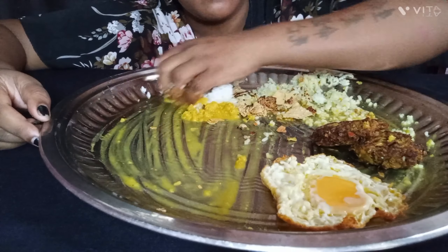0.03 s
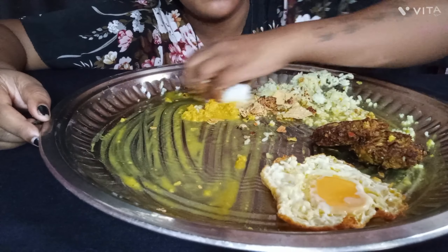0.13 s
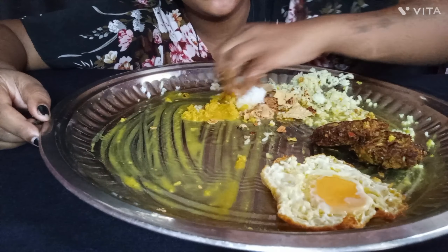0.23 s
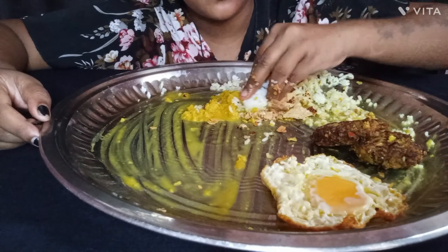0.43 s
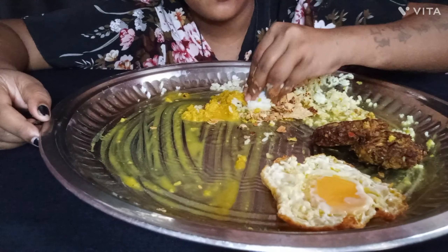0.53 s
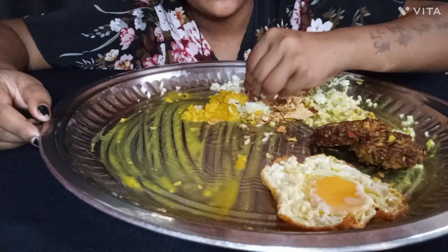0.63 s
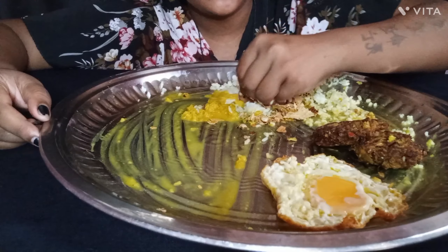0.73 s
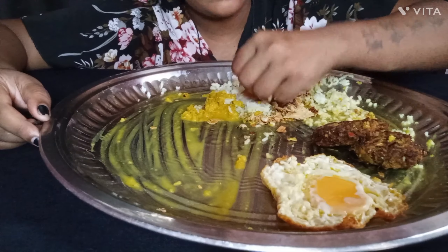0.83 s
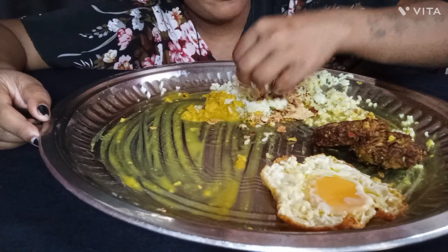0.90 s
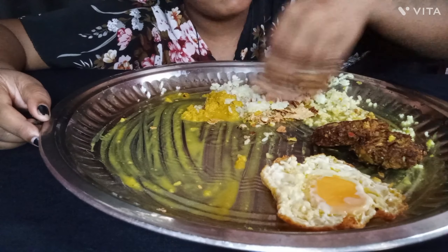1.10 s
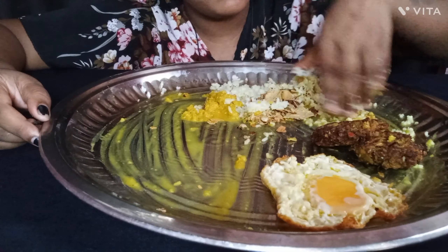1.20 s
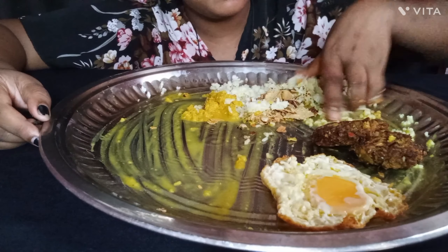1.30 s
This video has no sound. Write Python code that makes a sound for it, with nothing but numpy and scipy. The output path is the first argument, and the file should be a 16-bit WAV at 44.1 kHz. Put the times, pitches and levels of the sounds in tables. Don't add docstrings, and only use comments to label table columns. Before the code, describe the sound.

Close crunch of brittle bread being crushed over a metal plate, with a hoarse crow calling beyond

```python
import sys
import numpy as np
from scipy import signal
from scipy.fft import rfft, irfft
from scipy.io import wavfile
from scipy.ndimage import uniform_filter1d

SR = 44100
rng = np.random.default_rng(int(sys.argv[2]) if len(sys.argv) > 2 else 0)


def file_out(sig):
    cols = np.atleast_2d(sig).T
    lim = np.clip(cols, -1, 1)
    pcm = np.round(lim * 32767).astype(np.int16)
    wavfile.write(sys.argv[1], SR, pcm)


def gain_from_db(level_db):
    decades = np.asarray(level_db, float) / 20
    return 10 ** decades


N = 59535
T = np.arange(N) / SR


def level(x, db):
    return x * gain_from_db(db) / np.sqrt(np.mean(x ** 2))


def unit(x):
    return x / np.sqrt(np.sum(x ** 2))


def follow(table):
    start_s, level_db = np.array(table).T
    return gain_from_db(np.interp(T, start_s, level_db))


def colour(x, table):
    hz, db = np.array(table, float).T
    bins_hz = np.arange(513) * SR / 1024
    log_gain = np.interp(np.log(bins_hz + 1), np.log(hz), db) * np.log(10) / 20
    cepstrum = irfft(log_gain)
    cepstrum[1:512] *= 2
    cepstrum[513:] = 0
    return signal.fftconvolve(x, irfft(np.exp(rfft(cepstrum))))[:len(x)]


def ring(hz, t60, size=4096):
    t = np.arange(size) / SR
    return np.sin(2 * np.pi * hz * t) * np.exp(-np.log(1000) * t / t60)


def walk(rate_hz):
    hold = int(SR / rate_hz)
    steps = np.repeat(rng.standard_normal(N // 32), hold)[:N]
    smooth = uniform_filter1d(uniform_filter1d(steps, hold), hold)
    return smooth / smooth.std()


# pitch_hz, level_db (per Hz)
CRACK_TONE = [(750, -53.5), (1300, -1.5), (2900, 6.5), (6800, -11.5), (9300, -19.5), (12500, -40),
              (15500, -16.5), (16200, -28)]
# pitch_hz, level_db, t60_s
GLINTS = [(9294, -1, 0.014), (8500, -2.5, 0.013), (10520, -7, 0.0028), (15300, -3, .006)]


def snap(pitch_hz, treble_db, length_ms):
    size = 3072
    fractures_per_ms, fracture_db, first_db = 4.6, 4.5, 10.5
    crumble_db, crumble_s, rise_s = -24, .012, .0005
    shard_t60_s, shard_spread, shard_db = .009, .2, 3
    glint_db, glint_spread_db = 0, 5
    t = np.arange(size) / SR
    low, top = (signal.butter(6, 7500, kind, fs=SR, output="sos") for kind in ("low", "high"))
    where = rng.random(size)
    strength = rng.exponential(size=size)
    sign = rng.standard_normal(size)
    spread = rng.standard_normal(2 + len(GLINTS))

    fade = np.exp(-(t * 1200 / max(length_ms, .5)) ** 1.4) + gain_from_db(crumble_db) * np.exp(-t / crumble_s)
    hit = where < fractures_per_ms * 1000 / SR
    force = hit * np.sign(sign) * gain_from_db(fracture_db * np.minimum(strength, 3)) * fade
    force[0] = gain_from_db(first_db)
    broad = signal.sosfilt(low, colour(np.append(force, np.zeros(1024)), CRACK_TONE))

    dust = sign * gain_from_db(fracture_db * np.minimum(strength, 2)) * np.sqrt(fade) * fade ** .2
    dust = dust * np.minimum(t / rise_s, 1)
    glints = 0
    for (hz, db, t60), u in zip(GLINTS, spread[2:]):
        glints = glints + gain_from_db(db + glint_spread_db * u) * ring(hz * (1 + .02 * u), t60, size=1025)
    hiss = signal.sosfilt(top, colour(np.append(dust, np.zeros(1024)), CRACK_TONE))
    bright = signal.sosfilt(top, signal.fftconvolve(force, glints))
    treble = unit(hiss) + gain_from_db(glint_db) * unit(bright)

    modes = ring(pitch_hz, shard_t60_s, size=1025)
    weaker = .35 * gain_from_db(min(treble_db, 0) * .6)
    for u in spread[:2]:
        upper_hz = min(pitch_hz * 1.35 * np.exp(shard_spread * u), 6400 + 300 * u)
        modes = modes - weaker * ring(upper_hz, shard_t60_s * .7, size=1025)
    shard = np.gradient(signal.fftconvolve(force, modes))
    shard = signal.lfilter(*signal.butter(4, max(7500, 1.2 * pitch_hz), fs=SR), shard)
    body = unit(unit(broad) + gain_from_db(shard_db) * unit(shard))
    return body + gain_from_db(treble_db - 16) * unit(treble)


# start_s, peak_db, shard pitch_hz, treble_db, burst length_ms
SNAPS = [(.0034, -40, 2520, -12, 5.4), (0.0331, -29, 3260, -17, 2.5), (0.0537, -34, 3590, -12.5, 3),
         (0.167, -44.5, 3800, 13.5, 3.4), (0.1895, -26, 3830, 0, 3.2), (0.2459, -9, 2910, -1, 2.45),
         (0.2895, -21, 3800, -23, 2.4), (0.339, -24, 3940, -1, 2.7), (0.3831, -21.5, 3850, 1.5, 3),
         (.397, -27.5, 6300, 10.5, 7.5), (0.4254, -36, 4140, 2, 6.1), (0.4342, -19, 4000, -1, 3),
         (0.466, -24, 4050, -1, 1.72), (.481, -39.5, 9240, 9, 4.6), (0.4999, -19.5, 3850, -8, 2.6),
         (.520, -22, 3000, 4.5, 1.8), (0.544, -20, 4270, -11, 0.82), (.595, -24.5, 3800, -3, 3.6),
         (0.618, -12, 4990, 6, 1.5), (0.7863, -26, 3170, -36, 7.1), (0.861, -44, 3240, 0, 5),
         (0.8848, -26, 3150, -7, 7.2), (1.27, -48.5, 3490, 1.5, 8.7),
         (0.038, -24, 3300, -28, 1.6), (0.201, -32.5, 3880, -15, 2.7), (0.22, -43.5, 3000, -16, 7),
         (0.239, -20, 4050, -21.5, 1.7), (0.252, -35, 3460, -14, 1.4), (0.38, -34, 9160, -3, 1.97),
         (0.523, -26, 3880, -12.5, 5.3), (0.564, -32, 4800, -3, 1.8), (0.576, -32, 4760, -5, 3),
         (0.586, -33, 5360, -12, 2.6), (0.457, -32.5, 5300, 6, 4.9), (0.5992, -19.5, 3040, -2, 2.6),
         (0.62, -13, 2850, 1, 3), (.634, -48, 3760, 1, 3), (0.6903, -42.5, 4930, -13, 1.3),
         (0.9157, -42, 3300, -25, 8.6), (0.995, -54, 4500, -17, 4)]
CHIPS = [(.11, -55, 4200, 2, 2), (.1275, -63, 4000, -4, 2), (.194, -55, 7000, 20, 6),
         (.2885, -31.5, 6500, -18, 4), (.304, -31, 5300, -12, 4), (.338, -29.5, 6400, 7, 4),
         (.339, -36.5, 8500, 8, 5), (.358, -52, 6400, 2, 4), (.384, -40, 6300, -8.5, 4),
         (.437, -32, 6100, 0, 6), (.449, -37, 4730, 1, 3), (.4735, -35, 4960, 4, 2),
         (.489, -40, 4250, 5, 3), (0.51, -42, 5370, 0, 2.4), (0.534, -41, 4900, 5, 2.6),
         (0.553, -45, 4550, -10, 2), (0.5897, -37, 5000, 9, 2.2), (.545, -49, 6100, -3, 8),
         (.7865, -34.5, 5700, -22, 5), (.788, -46, 7800, -29, 3), (.797, -46, 5600, -31, 6),
         (.874, -41.5, 6400, -11, 5), (.887, -34.5, 6100, 9.5, 9), (.918, -56, 6300, -11, 5),
         (1.13, -59.5, 6900, -16, 3)]
BREAK = [
    (0.2035, -4, 2840, 1, 2.6),
    (0.2068, -3, 2890, 4, 2.73),
    (0.2051, -11.5, 5530, 2.5, 3.8),
    (.2095, -13.5, 3750, 0, 3.5),
    (0.2157, -21.5, 4300, -0.5, 3),
    (0.228, -29, 3400, -5.5, 1.9),
]


def snaps():
    out = np.zeros(N + 8192)
    for start_s, peak_db, pitch_hz, treble_db, length_ms in SNAPS + CHIPS + BREAK:
        one = snap(pitch_hz, treble_db, length_ms)
        i = int(start_s * SR)
        out[i:i + len(one)] += gain_from_db(peak_db) * np.sqrt(length_ms * SR / 12000) * one
    return out[:N]


# start_s, crackle level_db
PRESS = [(0, -65), (.05, -67), (.12, -90), (.18, -69), (.21, -28), (.27, -49), (.4, -51), (.53, -48),
         (.58, -68), (.63, -48.5), (.72, -79.5), (.77, -68.5), (.8, -51.5), (.85, -89), (.9, -42),
         (.95, -80.5), (1.35, -74)]


def crumbs():
    crumbs_per_s, crumb_db, crumb_cycles, patchy_db = 270, 3, 11, 2
    out = 0
    for hz in 1500 * 2 ** np.arange(0, 3.5, .25):
        hit = rng.random(N) < crumbs_per_s / SR
        sign = np.sign(rng.standard_normal(N))
        force = hit * sign * gain_from_db(crumb_db * np.minimum(rng.exponential(size=N), 4))
        grain = np.gradient(ring(hz, crumb_cycles * 2 / hz, size=512))
        crackle = level(signal.fftconvolve(force, grain)[:N], 0)
        out = out + np.sqrt(hz) * crackle * gain_from_db(patchy_db * np.clip(walk(50), -2, 1.5))
    out = out * gain_from_db(1.4 * np.clip(walk(110), -2, 1.5))
    return level(colour(out, CRACK_TONE), 0) * follow(PRESS)


# pitch_hz, level_db, t60_s
PLATE_NOTES = [(1310.6, 1, 0.07), (1943, -20, 0.06), (2944, -2, 0.04), (3300, -6, .035),
               (3720, -9.5, 0.045), (3830, -12, 0.06), (5200, -19.5, .05), (6013, -20.5, 0.05)]
# start_s, level_db
KNOCKS = [
    (0.0529, -42),
    (0.2044, -21.5),
    (0.247, -41),
    (0.386, -38),
    (0.618, -37),
]
# start_s, level_db, pitch_hz, t60_s
BELL = [
    (.2015, -19, 848, 0.065),
    (.226, -28, 863, 0.087),
    (.252, -41.5, 882, 0.11),
    (.272, -47, 918, 0.23),
    (.385, -52, 892, 0.1),
    (.44, -54.5, 900, 0.11),
    (.619, -50.5, 857, 0.062),
]


def plate():
    size, knock_rise_s, bell_rise_s = 8192, .0005, .004
    t = T[:size]
    out = np.zeros(N + size)
    for start_s, knock_db in KNOCKS:
        i = int(start_s * SR)
        notes = sum(gain_from_db(knock_db + db) * ring(hz, t60, size=size) for hz, db, t60 in PLATE_NOTES)
        out[i:i + size] += notes * np.minimum(t / knock_rise_s, 1)
    for start_s, level_db, pitch_hz, t60_s in BELL:
        i = int(start_s * SR)
        rise = np.sin(np.pi / 2 * np.minimum(t / bell_rise_s, 1)) ** 2
        out[i:i + size] += gain_from_db(level_db) * ring(pitch_hz, t60_s, size=size) * rise
    return signal.sosfilt(signal.butter(6, 720, "high", fs=SR, output="sos"), out[:N])


# start_s, level_db, pitch_hz, length_s
BUMPS = [
    (0.209, -63.5, 60, 0.025),
    (0.203, -58.5, 137, 0.026),
    (0.202, -62.5, 233, 0.039),
    (.205, -57.5, 324, 0.032),
    (.237, -59.5, 337, 0.031),
    (.238, -60, 198, 0.042),
    (0.253, -58.5, 294.6, 0.054),
    (0.429, -65.5, 254, 0.052),
    (0.593, -77.5, 68.7, 0.052),
    (0.614, -67, 256.4, 0.049),
]


def bumps():
    out = 0
    for start_s, level_db, pitch_hz, length_s in BUMPS:
        swell = np.sin(np.pi * np.clip((T - start_s) / length_s, 0, 1))
        out = out + gain_from_db(level_db) * np.sin(2 * np.pi * pitch_hz * (T - start_s)) * swell
    return gain_from_db(1.1 * walk(90)) * out


def resonances(peaks):
    hz = np.geomspace(300, 8000, 200)
    gain = sum(gain_from_db(db) / (1 + (2 * (hz - f) / width) ** 2) ** 1.7 for f, width, db in peaks)
    return np.c_[hz, 20 * np.log10(gain)]


def caw(table, throat, half_db):
    jitter, jitter_hz, breath_db = 0.026, 90, 4
    rasp_db, rasp_hz = 8, 220
    start_s, pitch_hz, level_db, hoarse = np.array(table).T
    hoarse = np.clip(np.interp(T, start_s, hoarse), .42, 1)
    pitch = np.interp(T, start_s, pitch_hz) * (1 + jitter * hoarse * walk(jitter_hz))
    phase = 2 * np.pi * np.cumsum(pitch) / SR
    pulses = 0
    for k in range(1, 13):
        pulses = pulses + np.cos(k * phase) + gain_from_db(half_db) * hoarse * np.cos((k + .5) * phase)
    voice = pulses * gain_from_db(rasp_db * hoarse * np.clip(walk(rasp_hz), -2, 1.2))
    air = level(rng.standard_normal(N), breath_db) * hoarse
    sound = level(colour(level(voice, 0) + air, resonances(throat)), 0)
    sounding = (T > start_s[0]) * (T < start_s[-1])
    return sound * gain_from_db(np.interp(T, start_s, level_db)) * sounding


# start_s, pitch_hz, level_db, hoarseness (0-1)
FIRST_CAW = [
    (.27, 471.2, -45, 0.52),
    (.3, 483.7, -36, 0.51),
    (.345, 490.4, -31, 0.6),
    (.395, 482.4, -34.5, 0.61),
    (.43, 465.5, -37, 0.81),
    (.5, 445.6, -38, 0.65),
    (.54, 429, -45.5, 1),
    (.57, 413, -74.5, 0.75),
]
SECOND_CAW = [
    (.785, 459, -47, 0.53),
    (.818, 482.8, -38.5, 0.43),
    (.855, 496.4, -38, 0.33),
    (.895, 492.6, -35.5, 0.88),
    (.944, 486, -39.5, 0.34),
    (.985, 455, -42.5, 0.32),
    (1.014, 437, -35, 0.2),
    (1.07, 425.4, -48, 0.87),
    (1.11, 414.4, -61.5, 1),
]
# pitch_hz, width_hz, level_db
FIRST_THROAT = [(900, 41, -25), (1421, 230, 1.5), (1972, 435, 6.5), (2232, 270, 3), (2415, 215, 1.5)]
SECOND_THROAT = [(970, 92, -7), (1415, 300, -5), (1873, 650, 8.5), (2370, 310, 8), (3270, 160, -8),
                 (3800, 97, -17.5), (4483, 190, -15)]


def crow():
    return caw(FIRST_CAW, FIRST_THROAT, half_db=0) + caw(SECOND_CAW, SECOND_THROAT, half_db=-12)


def tail(x, t60, dull_hz):
    t = T[:N // 2]
    fade = np.exp(-np.log(1000) * t / t60)
    noise = rng.standard_normal(N // 2) * fade * np.minimum(t / 0.016, 1)
    low = signal.lfilter(*signal.butter(1, dull_hz, fs=SR), noise)
    echo = low + (noise - low) * fade
    return signal.fftconvolve(x, unit(echo))[:N]


# pitch_hz, level_db (per Hz)
HUM_TONE = [(30, -41), (95, -22.5), (900, -12.5), (1300, -3.5), (1900, 0), (4400, -38.5), (8000, -41.5),
            (16500, -52.5)]
# start_s, level_db
WHINE = [(0, -90), (.16, -88.5), (.7, -92), (.775, -84), (.8, -86), (1.12, -94.5), (1.16, -71), (1.26, -82),
         (1.35, -91)]


def hum():
    whine_hz, width_hz, hum_db = 15650, 140, -56
    edges = [whine_hz - width_hz / 2, whine_hz + width_hz / 2]
    band = signal.butter(3, edges, "band", fs=SR, output="sos")
    whine = level(signal.sosfilt(band, rng.standard_normal(N)), 0) * follow(WHINE)
    street = level(colour(rng.standard_normal(N), HUM_TONE), hum_db) * gain_from_db(walk(11))
    return street + whine


def scene():
    near = snaps() + crumbs() + plate()
    far = crow()
    room = gain_from_db(-12.5) * tail(near, t60=0.15, dull_hz=3000)
    yard = gain_from_db(-9) * tail(far, t60=.28, dull_hz=4500)
    return (near + far + room + yard + bumps() + hum())[None]


def top_cut(x):
    return signal.sosfilt(signal.butter(12, 17140, fs=SR, output="sos"), x)


def record(dry):
    low_pass = signal.ellip(8, .2, 60, 16000, fs=SR, output="sos")
    mix = signal.sosfilt(low_pass, dry)
    return top_cut(mix)


dry = scene()
out = record(dry)
file_out(out)
```